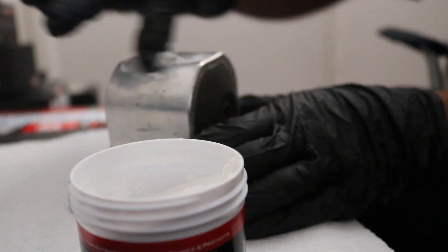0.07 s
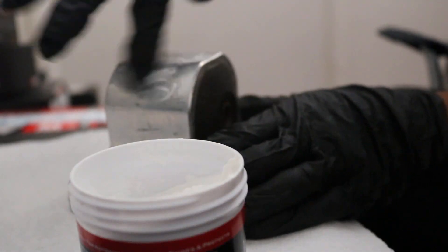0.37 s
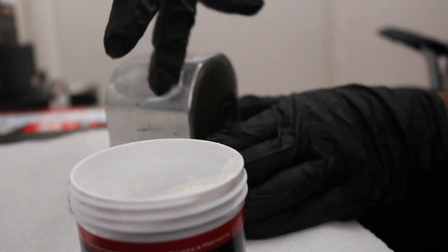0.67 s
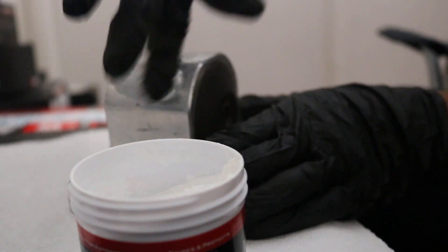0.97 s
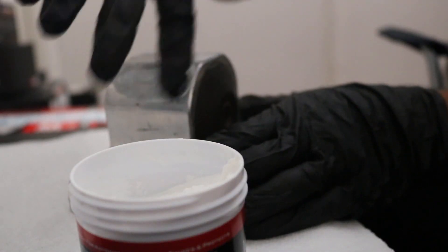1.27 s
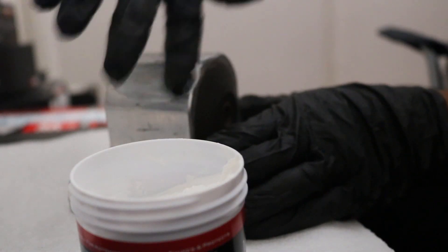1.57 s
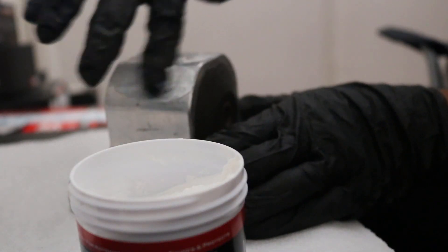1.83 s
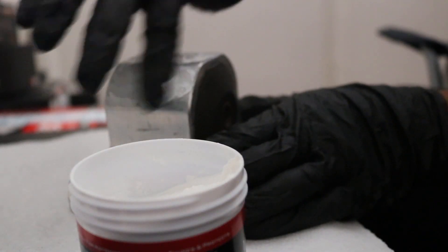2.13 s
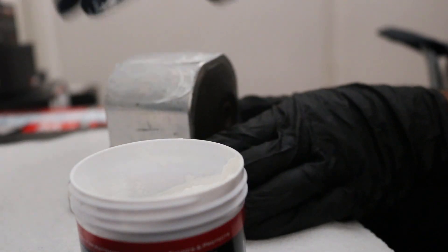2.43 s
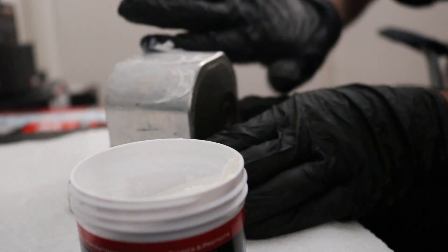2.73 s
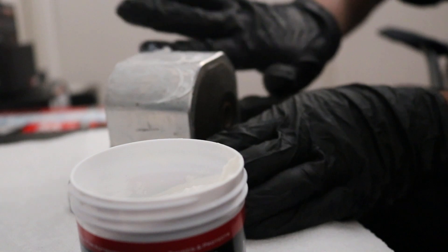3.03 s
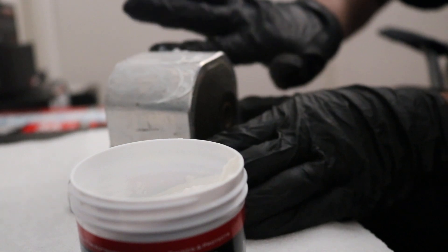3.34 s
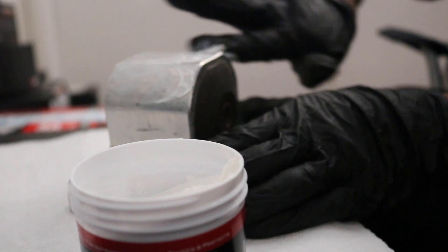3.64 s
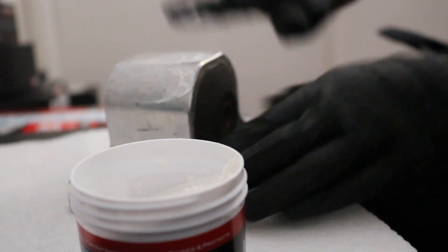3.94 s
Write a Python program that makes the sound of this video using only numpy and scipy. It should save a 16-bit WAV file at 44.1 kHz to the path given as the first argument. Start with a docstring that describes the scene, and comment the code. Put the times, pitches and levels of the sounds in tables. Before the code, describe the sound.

A gloved fingertip rubs polishing paste over a metal block in short, uneven strokes, each a soft gritty rasp with a wet hiss. A few tiny clicks and rubber chirps come through. Low ventilation hum fills the small room.

```python
"""A low hum of mains and ventilation fills a small room as short, hissing strokes begin.
A gloved fingertip works polishing paste over a metal block: grit excites resonances near 3.5 kHz,
the wet paste hisses and fizzes, and the glove drags dully. Now and then the rubber chirps by
stick-slip friction, or a coarse grain cracks. Later the glove squeaks faintly, and strokes along
the far edge make one mode of the metal sing."""
import sys
import numpy as np
from scipy import signal
from scipy.io import wavfile
from scipy.ndimage import uniform_filter1d

SR = 44100
rng = np.random.default_rng(int(sys.argv[2]) if len(sys.argv) > 2 else 0)


def master(y):
    """Save y as 16-bit WAV."""
    cut = np.clip(np.atleast_2d(y).T, -1, 1)
    pcm = np.round(cut * 32767)  # scale
    wavfile.write(sys.argv[1], SR, pcm.astype(np.int16))


N = 176400
TIME = np.arange(N) / SR

# mains and fan tones: (frequency [Hz], rms level [dB], wander [Hz])
HUM_TONES = [(54.23, -54, 0.08), (58.78, -37.5, 0.11), (118.3, -49.5, 0.67), (145.4, -50, 0.81),
             (162.3, -52.5, 0.32), (178, -57.5, 0.13), (215.5, -60, 1.15), (236.7, -59.5, 1.1),
             (295.8, -60.5, 2.6), (402.8, -59.5, 10), (566.3, -65.5, 14.06), (646, -67, 10.08),
             (772, -67, 20)]
# ventilation noise: (frequency [Hz], relative density [dB])
AIR_SPECTRUM = [(25, -19), (40, -4), (62, -7.5), (80, 3), (100, -5), (140, 2.5), (200, -8.5), (280, -4),
                (350, -20.5), (420, -6.5), (500, -12.5), (750, -17), (1000, -22.5), (1600, -23.5),
                (2400, -26.5), (3300, -23.5), (4500, -29.5), (8000, -32.5), (15000, -40.5)]
# its likeness at the two ears: (frequency [Hz], correlation [0-1])
AIR_CORRELATION = [(60, 0.93), (150, 0.97), (380, 0.72), (950, 0.56), (2400, 0), (6000, 0.01), (15000, 0.1)]
# finger strokes: (middle [s], length [s], relative rasp [dB], relative hiss [dB], hiss centre [Hz])
FINGER_STROKES = [(0.021,0.078,-49.5,-52,7560), (0.18,0.13,-47,-50,7040), (0.317,0.08,-49,-51,7500),
                  (0.424,0.069,-46,-48,8300), (0.627,0.12,-54.5,-53.5,6000), (0.803,0.022,-47,-49.5,7700),
                  (1.043,0.1,-50,-54.5,6800), (1.248,0.059,-53.5,-58,7000), (1.332,0.023,-49.5,-58,7000),
                  (1.395,0.068,-46.3,-52,7000), (1.57,0.037,-62,-49.5,7540), (1.678,0.046,-49.5,-51,7000),
                  (1.742,0.045,-53.5,-54.5,7000), (1.841,0.05,-48.5,-51,6540), (1.923,0.034,-49,-67,7000),
                  (2.015,0.13,-48,-51.5,7040), (2.172,0.076,-53,-50,6940), (2.283,0.075,-48,-53.5,7250),
                  (2.478,0.06,-59,-55.5,5800), (2.554,0.038,-45,-49.5,6800), (2.888,0.055,-52,-54.5,5200),
                  (3.005,0.16,-55.5,-54.5,6050), (3.163,0.053,-52,-54,5600), (3.24,0.056,-52,-46,5160),
                  (3.3,0.068,-53,-56.5,7000), (3.356,0.064,-49,-51,8150), (3.474,0.15,-56,-61,6360),
                  (3.542,0.066,-52.5,-48,7340), (3.721,0.053,-46,-49.5,8050), (3.798,0.058,-46,-52.5,7400),
                  (3.886,0.057,-49,-54.5,6000), (3.954,0.076,-47,-50.5,6250)]
# resonances struck by the grit: (frequency [Hz], bandwidth [Hz], relative gain [dB])
GRIT_MODES = [(3090, 240, -8), (3330, 230, 1), (3730, 270, 0.5), (4060, 400, -9.5)]
# the rasp darkens as the finger works further back: (time [s], tilt [dB/octave])
GRIT_TILT = [(.8, 23), (1.4, -8), (2.3, 2), (3.25, -6), (3.8, 9)]
# likeness of the rubbing at the two ears: (frequency [Hz], correlation [0-1])
RUB_CORRELATION = [(1000, 0.29), (3500, 0.9), (7000, 0.34), (14000, .2)]
# fine sheen of the wet paste: (frequency [Hz], relative density [dB])
SHEEN_SPECTRUM = [(2500, -4), (4500, 5.5), (7500, -3.5), (9500, -2.5), (11000, -4), (13000, -4.5),
                  (15500, -19)]
# dull drags of the glove: (middle [s], length [s], level [dB])
GLOVE_DRAGS = [(0.206, 0.066, -54), (3.365, 0.087, -56), (3.33, 0.84, -63.5), (3.95, 0.11, -52.5)]
# their friction noise: (frequency [Hz], relative density [dB])
DRAG_SPECTRUM = [(500, -43), (900, 5), (1500, 3), (2200, 3.5), (2800, 3), (4000, -36)]
# slips of the rubber: (time [s], length [s], pitch [Hz], level [dB], left minus right [dB])
RUBBER_SLIPS = [(0.655, 0.0035, 1700, -39, -6), (0.6593, 0.0016, 1500, -36.5, -18),
                (3.2797, 0.0079, 1557, -34.5, -7), (3.391, 0.0046, 1370, -42, -9),
                (3.969, 0.0024, 2870, -35.5, -6)]
# coarse grains breaking: (time [s], relative level [dB], ring frequency [Hz])
GRAIN_CRACKS = [(0.8115, -37.5, 3760), (0.9575, -46, 4020), (1.3313, -39.5, 3430), (2.5666, -34, 3660),
                (3.807, -38, 3850)]
# the wet glove sliding off: (middle [s], length [s], pitch [Hz], level [dB])
GLOVE_SQUEAKS = [(2.399, 0.017, 4570, -57), (2.445, 0.02, 4780, -55.5)]
# strokes along the far edge of the metal: (middle [s], length [s], level [dB])
EDGE_STROKES = [(3.0, 0.22, -56.5), (3.28, .07, -56), (3.5, 0.16, -55)]

CONTACT_CORRELATION, CONTACT_PAN_DB = 0.76, -2.4


def from_db(db):
    """Amplitude grows tenfold for every 20 dB."""
    return 10 ** (np.asarray(db) / 20)


def rms_one(x):
    """Normalisation to unit mean power."""
    return x / np.sqrt(np.mean(x ** 2) + 1e-20)


def at_hz(points, hz):
    """Interpolation on a logarithmic frequency axis."""
    frequencies, values = np.transpose(points)
    return np.interp(np.log(hz), np.log(frequencies), values)


def pan(db):
    """Channel gains for a level difference, left minus right."""
    return from_db(np.array([[db], [-db]]) / 2)


def drift(corner_hz):
    """Low-passed noise of unit rms: a smooth random fluctuation."""
    step, settle = 40, 2000  # samples per point; points discarded
    pole = np.exp(-2 * np.pi * corner_hz * step / SR)
    white = rng.standard_normal(N // step + settle + 2)
    slow = signal.lfilter([1], [1, -2 * pole, pole * pole], white)[settle:]
    return np.interp(np.arange(N) / step, np.arange(len(slow)), rms_one(slow))


def widen(mid, side, correlation):
    """The sum and difference of independent signals form a partly correlated stereo pair."""
    left_right = np.array([[1], [-1]])
    return np.sqrt((1 + correlation) / 2) * mid + np.sqrt((1 - correlation) / 2) * side * left_right


def bandpass(x, low_hz, high_hz, order=2):
    """A band-pass filter; at order 1, a simple damped resonator."""
    return signal.sosfilt(signal.butter(order, [low_hz, high_hz], "band", fs=SR, output="sos"), x + 1e-18)


def band(x, low_hz, high_hz, correlation, order=2):
    """Two independent signals, band-limited and mixed to stereo at unit rms."""
    return rms_one(widen(*bandpass(x, low_hz, high_hz, order), correlation))


def noise(spectrum, correlation):
    """Third-octave bands superpose into coloured stereo noise of unit rms."""
    out, white = 0, rng.standard_normal((2, 2, N))
    edges = 22 * 2 ** (np.arange(30) / 3)
    for k, (low, high) in enumerate(zip(edges, edges[1:])):
        if high > spectrum[0][0] and low < spectrum[-1][0]:
            hz = np.sqrt(low * high)
            mid, side = bandpass(white[k % 2], low, high)
            out = out + from_db(at_hz(spectrum, hz)) * widen(mid, side, at_hz(correlation, hz))
    return rms_one(out)


def swell(t, middle, length, flatness=2.5):
    """Amplitude follows the speed of the finger, in a flat-topped bell."""
    return np.exp(-.5 * np.minimum(np.abs(2 * (t - middle) / length) ** flatness, 40))


def stroke_level(rows):
    """Overlapping strokes are incoherent, so their powers add."""
    t = TIME[::20]
    power = sum((from_db(db) * swell(t, middle, length)) ** 2 for middle, length, db in rows)
    return np.interp(TIME, t, np.sqrt(power))


def clicks(per_s=5000, spread_db=3):
    """Shot noise: two independent trains of random impulses of uneven size."""
    sizes = from_db(spread_db * np.minimum(rng.exponential(1, (2, N)), 5))
    signs = rng.choice([-1, 1], (2, N))
    return sizes * signs * (rng.random((2, N)) < per_s / SR)


def hum():
    """Mains and fan tones superpose, each wavering in frequency and level."""
    out, strongest = 0, max(db for _, db, _ in HUM_TONES)
    for hz, db, wander_hz in HUM_TONES:
        waver_db = 0.63 if db == strongest else 2.5
        cycles = np.cumsum(hz + wander_hz * drift(corner_hz=3.883)) / SR + rng.random()
        amplitude = np.sqrt(2) * from_db(db + waver_db * drift(corner_hz=1.83))
        out = out + amplitude * np.sin(2 * np.pi * cycles)
    return out * pan(db=1.14)


def ventilation():
    """Moving air gives steady broadband noise, most coherent at low frequencies."""
    return from_db(-43.5) * noise(AIR_SPECTRUM, AIR_CORRELATION)


def grit_rasp(gain_db=-3.5, pivot_hz=3750):
    """Dense impacts of grit excite damped resonances, whose balance shifts as the finger moves."""
    modes, tilt = 0, np.interp(TIME, *np.transpose(GRIT_TILT))
    for hz, width_hz, db in GRIT_MODES:
        ring = bandpass(clicks(), hz - width_hz / 2, hz + width_hz / 2, order=1)
        gain = from_db(db + tilt * np.log2(hz / pivot_hz))
        modes = modes + gain * widen(*ring, CONTACT_CORRELATION)
    rasp = rms_one(bandpass(modes, 2750, 4700, order=3) * pan(CONTACT_PAN_DB))
    middle, length, rasp_db, _, _ = np.transpose(FINGER_STROKES)
    return stroke_level(zip(middle, length, rasp_db + gain_db)) * rasp


def paste_swishes(gain_db=-6, width_octaves=0.66):
    """Squeezed paste radiates band-limited noise whose centre varies from stroke to stroke."""
    out, white = np.zeros((2, N)), rng.standard_normal((2, N))
    for middle, length, _, db, hz in FINGER_STROKES:
        near = np.abs(TIME - middle) < 1.5 * length
        edges = hz * 2 ** (np.array([-.5, .5]) * width_octaves)
        swish = band(white[:, near], *edges, at_hz(RUB_CORRELATION, hz))
        out[:, near] += from_db(db + gain_db) * swell(TIME[near], middle, length) * swish
    return out


def paste_hiss():
    """Bursting bubbles add shot noise to the swishes; the breaking wet film modulates a fine sheen."""
    middle, length, _, hiss_db, _ = np.transpose(FINGER_STROKES)
    smear = stroke_level(zip(middle, length, hiss_db))
    bubbles = from_db(-11) * band(clicks(per_s=970), 5800, 10000, correlation=.4)
    swishes = paste_swishes()
    fizz_db = 2.2 * drift(corner_hz=260)
    sheen = from_db(-5.5 + fizz_db) * noise(SHEEN_SPECTRUM, RUB_CORRELATION)
    return (swishes + smear * (bubbles + sheen)) * pan(db=1.3)


def glove_drag():
    """Sliding friction of the glove gives dull midrange noise."""
    return stroke_level(GLOVE_DRAGS) * noise(DRAG_SPECTRUM, RUB_CORRELATION) * pan(db=-2)


def rubber_slips(sag=0.24, attack=0.56, octave_db=-11):
    """Stick-slip oscillation: the rubber catches and chirps for a few cycles, sagging in pitch."""
    out = np.zeros((2, N))
    for time, length, hz, db, pan_db in RUBBER_SLIPS:
        progress = np.linspace(0, 1, int(length * SR))
        phase = 2 * np.pi * np.cumsum(hz * (1 - sag * (progress - .5))) / SR
        envelope = from_db(db) * np.sin(np.pi * progress ** attack)  # rises faster than it dies
        chirp = envelope * (np.sin(phase) + from_db(octave_db) * np.sin(2 * phase))
        start = int(time * SR)
        out[:, start:start + len(chirp)] += (chirp * pan(pan_db))[:, :N - start]
    return out


def grain_cracks(gain_db=-2.5, decay_s=0.0029, width_hz=440):
    """Fracture of a coarse grain gives a snap and a damped ring, pitched by where it breaks."""
    snap = from_db(-10) * band(rng.standard_normal((2, N)), 2300, 7100, CONTACT_CORRELATION)
    out, white = 0, rng.standard_normal((2, N))
    for time, db, hz in GRAIN_CRACKS:
        ring = band(white, hz - width_hz / 2, hz + width_hz / 2, CONTACT_CORRELATION)
        local_power = uniform_filter1d(np.mean(ring ** 2, axis=0), size=64)
        steady_ring = ring / np.sqrt(local_power + 1e-9)
        decay = (TIME >= time) * np.exp(-np.clip((TIME - time) / decay_s, 0, 20))
        out = out + from_db(db + gain_db) * decay * (steady_ring + snap)
    return out * pan(CONTACT_PAN_DB)


def glove_squeaks(rise_hz_per_s=3500):
    """Friction of wet, sliding rubber sustains thin, unsteady tones that rise slightly."""
    out, jitter_hz = 0, 110 * drift(corner_hz=200)
    for middle, length, hz, db in GLOVE_SQUEAKS:
        cycles = np.cumsum(hz + rise_hz_per_s * (TIME - middle) + jitter_hz) / SR
        out = out + from_db(db) * swell(TIME, middle, length) * np.sin(2 * np.pi * cycles)
    return out * pan(CONTACT_PAN_DB)


def metal_singing(hz=3325, width_hz=170):
    """Resonance: broadband friction feeds one narrow mode of the metal."""
    mode = band(clicks(), hz - width_hz / 2, hz + width_hz / 2, CONTACT_CORRELATION, order=1)
    return stroke_level(EDGE_STROKES) * mode * pan(CONTACT_PAN_DB)


def reverberation(x, t60_s=0.47, gain_db=-11.5):
    """Diffuse reflections decay exponentially and differ at each ear."""
    t = TIME[:SR // 2]
    tail = rng.standard_normal((2, len(t))) * from_db(-60 * t / t60_s) * (t > .003)
    tail /= np.sqrt(np.sum(tail ** 2, axis=1, keepdims=True))
    return from_db(gain_db) * signal.fftconvolve(x, tail, axes=1)[:, :N]


def scene(rasp_judder_db=1.06, hiss_judder_db=1.53):
    """The sources superpose in the room; the finger's judder modulates rasp, hiss and drag together."""
    judder = drift(corner_hz=31)
    rasp, hiss, drag = grit_rasp(), paste_hiss(), glove_drag()
    rubbing = (rasp + drag) * from_db(rasp_judder_db * judder) + hiss * from_db(hiss_judder_db * judder)
    finger = rubbing + metal_singing() + grain_cracks() + rubber_slips() + glove_squeaks()
    return finger + reverberation(finger) + hum() + ventilation()


def record(dry, cutoff_hz=15700):
    """A steep low-pass filter removes the highest treble."""
    return signal.sosfilt(signal.ellip(12, .1, 90, cutoff_hz, fs=SR, output="sos"), dry)


dry = scene()
out = record(dry)
master(out)
```